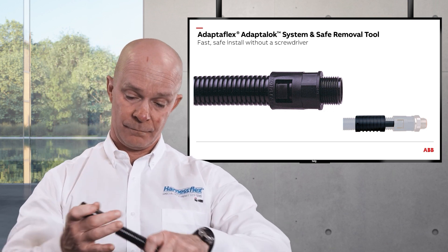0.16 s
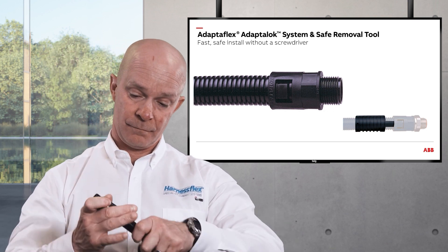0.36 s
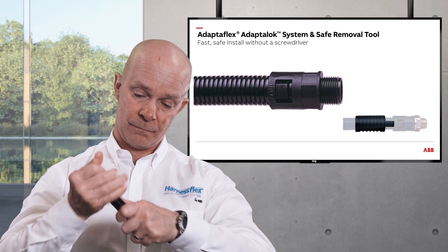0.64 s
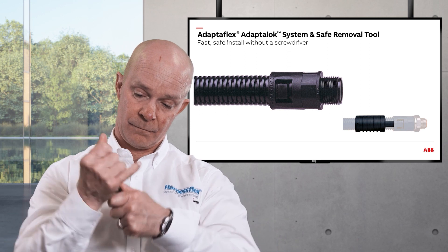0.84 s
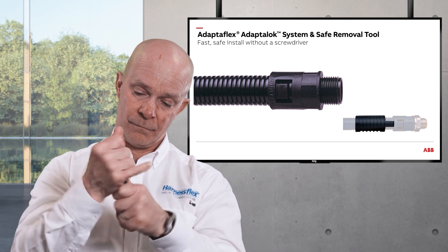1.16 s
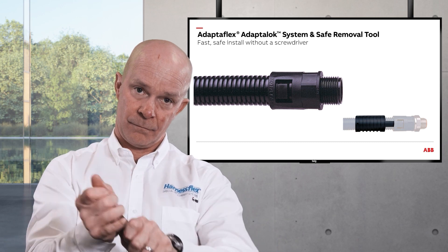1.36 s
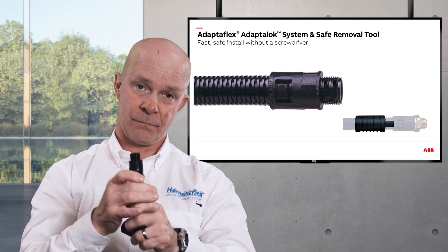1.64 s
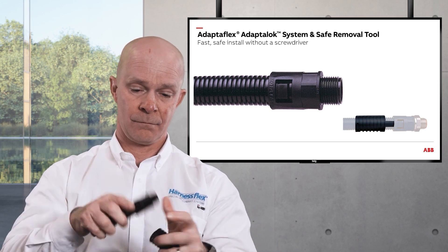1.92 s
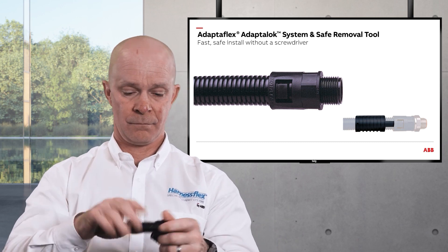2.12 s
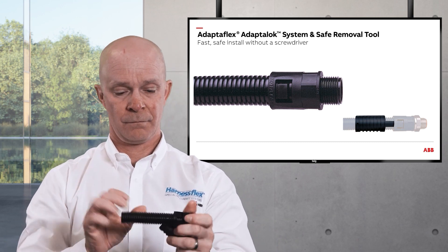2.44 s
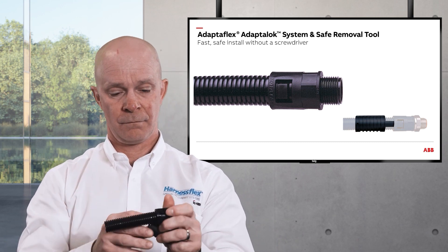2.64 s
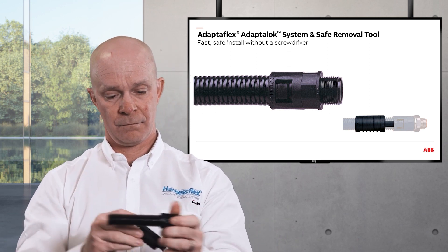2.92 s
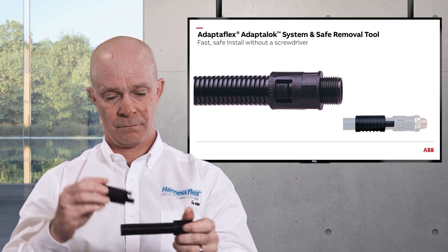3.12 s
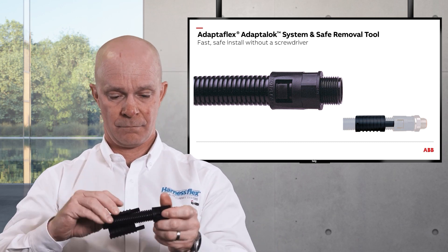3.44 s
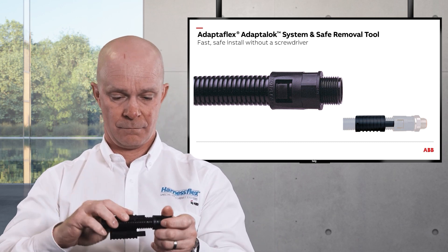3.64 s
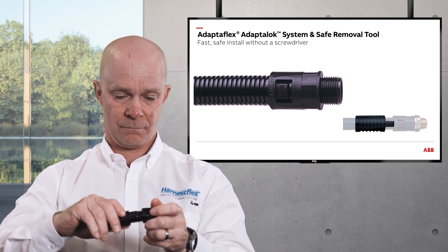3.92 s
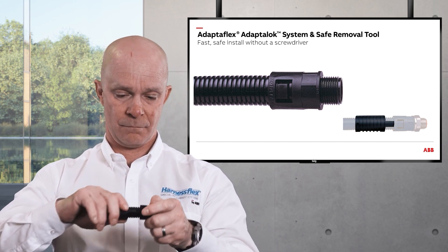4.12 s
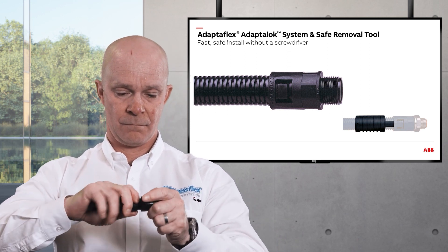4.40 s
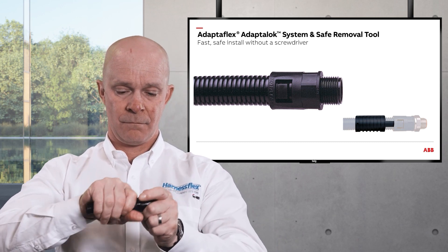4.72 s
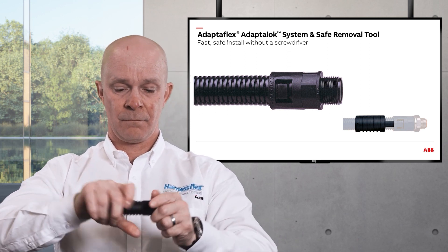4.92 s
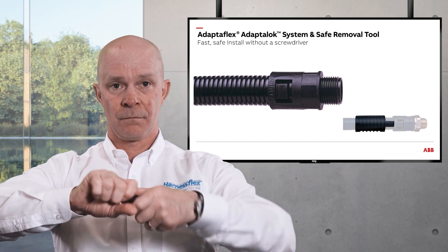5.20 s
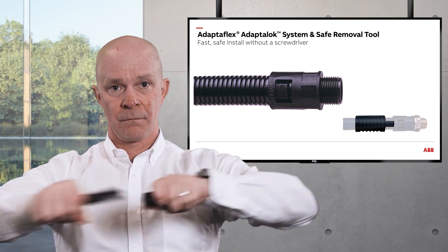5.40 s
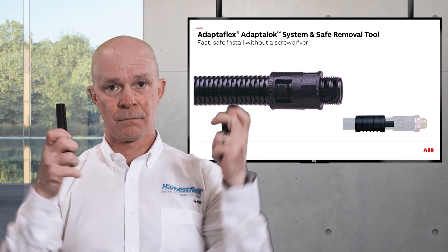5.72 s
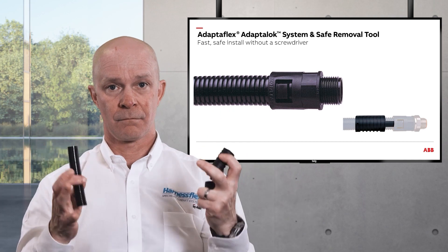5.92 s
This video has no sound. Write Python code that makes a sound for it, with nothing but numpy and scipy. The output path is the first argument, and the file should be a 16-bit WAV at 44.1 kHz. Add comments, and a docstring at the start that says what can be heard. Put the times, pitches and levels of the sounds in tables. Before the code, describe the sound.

Hard plastic parts knock and snap together in two hands, with brief hollow tube rings, small ticks and faint rubbing in a quiet room.

```python
"""Knocks, clicks and sharp snaps of plastic, some with a short ring, among soft rubs and scrapes in a quiet room.
Hands work a push-fit fitting on corrugated conduit: parts knock together, a removal tool clips on,
and the latch snaps over the ribs until the conduit comes free. Each contact is a noise burst of a few
milliseconds shaped by resonances; hard ones also ring the ribbed wall and the air in the tube.
Grains of noise make the friction, and shaped noise the room tone and low swells of moving arms."""
import sys
import numpy as np
from scipy import signal
from scipy.fft import rfft, irfft
from scipy.io import wavfile
from scipy.ndimage import uniform_filter1d, minimum_filter1d

SR = 44100
rng = np.random.default_rng(int(sys.argv[2]) if len(sys.argv) > 2 else 0)


def write(x):
    x = np.atleast_2d(x).T
    wavfile.write(sys.argv[1], SR, np.round(np.clip(x, -1, 1) * 32767).astype(np.int16))


N = 267113  # scene length in samples

# A finger or sleeve slides, swells, catches on a rib with a small tick and lets go:
# (catch time [s], 60 dB swell [s], 60 dB release [s], dull rub before trim [dB], bright rub before trim [dB],
#  tick level [dB], tick pitch [Hz])
RUB_STROKES = [(0.192, 0.02, .1, -89, -63.5, -37.5, 5600), (.5636, .025, .17, -53, -74, -23, 1040),
               (1.061, 0.18, 0.12, -67, -80, -62, 2968), (1.542, 0.066, .3, -90, -62, -46, 6500),
               (1.665, 0.39, .1, -64, -70, -26, 1656), (1.706, 0.073, .1, -71, -70, -34.5, 4570),
               (2.088, 0.057, .07, -83, -91, -41, 8030), (2.3976, 0.081, .04, -70, -67.5, -36.5, 1950),
               (2.4286, 0.023, .1, -57.5, -65.5, -31.5, 5390), (2.9459, .06, .11, -62, -70, -36, 1720),
               (3.564, 0.073, .13, -55.5, -60.5, -32, 1960), (3.9645, 0.065, .12, -71, -58, -31, 1694),
               (4.5023, .02, .28, -73.5, -64, -29, 3520), (4.581, 0.25, .1, -68, -63.5, -38, 3940),
               (4.6598, 0.066, .07, -55, -77.5, -41, 2143), (4.968, 0.092, .33, -63.5, -66, -37.5, 4010),
               (5.166, 0.074, .28, -64, -56.5, -49, 8530), (5.3497, .25, .04, -71.5, -75, -20, 8830),
               (5.6092, 0.041, .14, -59, -57, -26, 2930), (5.6987, .05, .07, -57, -66, -29, 2086),
               (5.902, .1, .25, -72, -80.5, -60, 2190)]
EDGE_HZ = 16200  # upper band limit
TAPS, LEAD = 4096, 128  # samples: one contact's frame, and the lead-in before its blow


def amp(db):
    """Decibels to gain."""
    return 10 ** (np.asarray(db) / 20)


def evened(x):
    """Scales to rms 1."""
    return x / np.sqrt(np.mean(x ** 2) + 1e-20)


def read(points, hz):
    """Reads a curve of (frequency, value) points on a log-frequency axis."""
    f, value = np.transpose(points)
    return np.interp(np.log(hz + 1), np.log(f + 1), value)


def add(mix, s, sound):
    """Mixes a sound in at time s."""
    part = mix[max(round(s * SR), 0):][:len(sound)]
    part += sound[:len(part)]


def coloured(x, points):
    """Gives x a spectral colour, at rms 1."""
    hz = np.fft.rfftfreq(len(x), 1 / SR)
    return evened(irfft(rfft(x) * amp(read(points, hz)), len(x)))


def causal(db):
    """The frequency response of a passive body with this gain: it rings only after the blow."""
    log_gain = np.log(amp(np.r_[db, db[-2:0:-1]]))
    return np.exp(np.conj(signal.hilbert(log_gain)))[:len(db)]


def fade(t, t60, bend=1):
    """Falls 60 dB in t60; with bend over 1 it holds at first and then dies faster."""
    return np.exp(-np.log(1000) * (t / t60) ** bend)


def grains(per_s, spread_db):
    """Tiny slips at random moments, of uneven size when spread_db is above 0."""
    size = amp(spread_db * np.minimum(rng.exponential(1, N), 4)) * rng.choice([-1, 1], N)
    return size * (rng.random(N) < per_s / SR)


def contacts():
    """All knocks, and the light tick with which each sliding stroke catches."""
    # plastic on plastic: (time [s], level [dB], contact length [ms], thud [dB], knock [dB], fizz [dB],
    # first mode of the struck part [Hz], second mode [Hz], room send [dB])
    knocks = [(.3014, -0.5, 1.6, 5, -8, -11, 1110, 1330, -8.5),
              (.383, -18, 3.1, -10, -5, -24, 1150, 1950, 3),
              (.3962, -9, 2.5, 4.5, -8.5, -29, 2300, 1480, -14.5),
              (.4053, 0, 1.84, -4.5, -12.5, -27, 1060, 6030, -8.5),
              (.41, -9, 2, -18, -13, -10.5, 1960, 2800, -27),
              (.833, -27.5, 1.5, 7, 6.5, -12.5, 3530, 1110, 4),
              (.8455, 2, 2.18, 1.5, 13.5, 9.5, 4830, 3430, -7.5),
              (1.1011, 13, 2.5, -6.5, 7, -3, 3670, 1720, -10.5),
              (1.2207, 19.5, 1.62, -7, 2, -15.5, 3867, 1398, -15.5),
              (2.3246, 1, 1.26, -22, -5.5, -15.5, 1584, 2550, -14),
              (2.6046, -6.5, 1.82, 3.5, 11, -6.5, 1745, 813, -13),
              (3.3589, 1, 1.91, -17, -10, -4, 2390, 4626, -7),
              (3.3923, 0.5, 3.1, -16, -8, -15.5, 1930, 2950, -11.5),
              (3.4261, 10, 3.9, -17.5, -9.5, -17, 3210, 1900, -25),
              (3.4347, 6, 1, -37, -26, -18, 1920, 3370, -10),
              (3.4404, -1.5, 2, -11, -4, -13, 970, 1964, -10),
              (3.446, -2, 2.5, -23, 6.5, -11, 3510, 2600, -15),
              (3.7483, -9, 4.3, -12.5, -3.5, -24.5, 4200, 2210, -2),
              (3.772, -3, 2.5, -11, -1.5, -12, 4790, 1760, -12.5),
              (3.7915, -12, 3.3, -5, 2, -18.5, 9100, 7200, -14.5),
              (3.8658, -7.5, 2.26, -14.5, -2.5, -6, 2127, 10000, -12.5),
              (4.206, -25, 4.4, 9, -0.5, -8.5, 3090, 642, -1.5),
              (4.22, -15, 3, -2.5, -1.5, -4, 1640, 740, -17.5),
              (4.229, -0.5, 2.2, -3, -6, -6.5, 1690, 5440, -11),
              (4.2596, 0, 7.1, 12.5, 3, -4, 1630, 4230, -13),
              (4.2743, 17.5, 3.2, -9, -11.5, -10.5, 1560, 2640, -18),
              (4.739, 0.5, 3.5, 13.5, 15.5, -3.5, 2760, 1730, -11.5),
              (4.7445, 13.5, 1.73, 1.5, 1.5, -11.5, 1612, 1182, -13),
              (5.3757, 6, 2.64, -13, -1.5, -19, 720, 7700, -0.5),
              (5.3976, 12, 1.1, -34.5, -16.5, -11.5, 3200, 2460, -9),
              (5.4221, 19.5, 1.37, -10, 0, -5.5, 692, 2150, -31),
              (5.449, -5, 1.8, 9.5, 15.5, 6.5, 1570, 2220, -41.5),
              (5.4577, -7.5, 1.5, 22.5, 14.5, -19.5, 1620, 680, -11.5),
              (5.7166, -5, 2.5, -34, -32, -14, 11600, 5260, -10.5),
              (5.7566, -22, 2.3, -20, 4.5, -1.5, 6830, 3950, -10.5)]
    # tone shared by all ticks: [thud [dB], knock [dB], fizz [dB]]
    tick_tone = [-6, -4, -18]
    tick_ms, tick_room_db = 2.8, -7.5
    overtone = 2.02  # ratio of the second mode to the first
    ticks = [(s, db, tick_ms, *tick_tone, hz, hz * overtone, tick_room_db)
             for s, *_, db, hz in RUB_STROKES]
    return list(knocks) + ticks


def chatter(ms, tick=1.4, after=1.0, onset=0.37, flatten=.35):
    """Spectrum of one contact: brief ones are a sharp tick, long ones a swell of chattering faces."""
    t_ms = np.maximum(np.arange(TAPS) - LEAD, 0) / SR * 1000
    pressed = np.exp(-(t_ms / ms) ** 4) + after * np.exp(-t_ms / ms)
    grip = pressed * (1 - np.exp(-t_ms / (onset * ms)))
    burst = rng.standard_normal(TAPS) * grip
    burst[LEAD + 3] += tick * np.sqrt(SR / 1000) / ms
    z = rfft(burst)
    z /= (abs(z) + 1e-12) ** flatten  # so short a blow carries all pitches fairly evenly
    return z / np.sqrt(np.mean(abs(z) ** 2))


def clicks(ring_share=0.093, sub_db=-22, top_db=-3):
    """Each contact rings the shell and two modes of the struck part; returns direct sound and room send."""
    # tone bands of a contact: thud, knock, reference, bite and fizz [Hz]
    band_hz = [430, 1000, 2100, 4200, 9500]
    # the fitting's shell, which colours every contact: (frequency [Hz], width [Hz], gain [dB])
    shell_modes = [(457, 41, 3), (837.2, 86, 0), (1339, 70, -4), (1795, 760, 1), (2520, 720, -2.5),
                   (3200, 650, 1), (4772, 350, 1.5), (8300, 1100, -0.5), (11140, 2800, 1.5)]
    # prominence of the struck part's two modes at level 0 and above: [first [dB], second [dB]]
    mode_db = [12.5, 8]
    purity = 0.17  # the lighter the touch, the more the modes stand out: dB per dB under level 0
    bite_share, bite_db = 0.31, 2  # the bite near 4 kHz follows the fizz: dB per dB, plus an offset in dB

    hz, direct, sent = np.fft.rfftfreq(TAPS, 1 / SR), np.zeros(N), np.zeros(N)
    shell_db = sum(db / (1 + (2 * (hz - f) / width) ** 2) for f, width, db in shell_modes)
    for s, db, ms, thud, knock, fizz, hz1, hz2, room_db in contacts():
        bite = bite_db + bite_share * fizz
        lows = [(40, thud + 2 * sub_db), (150, thud + sub_db)]
        bands = list(zip(band_hz, [thud, knock, 0, bite, fizz]))
        colour_db = read(lows + bands + [(EDGE_HZ, fizz + top_db)], hz)
        ring_levels = np.array(mode_db) - purity * min(db, 0)
        for ring_hz, ring_db in zip((hz1, hz2), ring_levels):
            detuning = 2 * (hz / ring_hz - 1) / ring_share
            colour_db += 10 * np.log10(1 + amp(ring_db) ** 2 / (1 + detuning ** 2))
        body = causal(db + colour_db + shell_db)
        click = irfft(chatter(max(ms, .5)) * body)[:TAPS // 2]
        add(direct, s - LEAD / SR, click)
        add(sent, s - LEAD / SR, amp(room_db) * click)
    return direct, sent


def air_column(rise_s=0.002, damping_s=.16):
    """The air in the tube rings at a pitch set by how far it is pushed into the fitting; one row instead rings
    the fitting's hollow on its own."""
    # rung by a snap: (time [s], pitch [Hz], level [dB], t60 before the hand's damping [s]); # the row at 4.2287
    # s is the hollow of the fitting ringing by itself
    air_rings = [(1.1015, 856, -26, .2), (1.2213, 860, -27, 0.17), (2.6054, 908, -54, .15),
                 (3.3935, 481, -39.5, 0.062), (4.2195, 541, -23, 0.047), (4.2287, 1702, -35, 0.069),
                 (4.2605, 624, -15.5, 0.044), (4.2748, 539, -15.5, 0.044), (4.7345, 601, -14.5, 0.038),
                 (4.745, 562, -11.5, 0.064), (4.7449, 337, -30, 0.039), (5.3764, 675, -19.5, 0.067),
                 (5.3972, 710, -16, 0.066), (5.4225, 668, -12.5, 0.054), (5.439, 426, -25.5, .073),
                 (5.455, 101, -42, 0.12)]
    socket_hz, socket_db = 1682, -11  # the hollow of the fitting rings along at one pitch
    t, out = np.arange(SR // 2) / SR, np.zeros(N)
    held = np.exp(-(t / damping_s) ** 3)  # the gripping hand soon stops the ring
    socket = amp(socket_db) * np.sin(2 * np.pi * socket_hz * t)
    for s, hz, db, t60 in air_rings:
        tone = np.sin(2 * np.pi * hz * t) + socket
        ring = amp(db) * tone * fade(t, t60) * held * (1 - np.exp(-t / rise_s))
        # the ring carries little below half its pitch
        opening = signal.butter(2, hz / 2, "high", fs=SR, output="sos")
        add(out, s, signal.sosfilt(opening, ring))
    return out


def ribbed_wall(count=200, rise_s=.0025, edge_loss=0.072, bend=1.134):
    """Many nearly equal ribs give a cluster of modes that outlasts the click; the outer ones die sooner."""
    # (time [s], centre [Hz], spread [octaves], level [dB], t60 at the centre [s])
    rib_rings = [(.4056, 2210, 0.28, -45, 0.12), (0.8456, 5400, 0.14, -37, 0.38),
                 (.848, 3165, 0.22, -48.5, 0.57), (1.103, 3940, 0.47, -26.5, 0.3),
                 (1.224, 4096, 0.14, -27.5, 0.37), (1.2225, 4390, 0.37, -36.5, 0.49),
                 (1.223, 1750, .12, -49.5, .25), (1.7011, 4540, 0.043, -48.5, 0.05),
                 (2.606, 4580, 0.19, -60, 0.25), (2.605, 1808, 0.012, -49.5, 0.24),
                 (3.8655, 2048, .078, -63, .2), (4.275, 2850, .15, -34.5, .21),
                 (4.745, 2550, 0.25, -30, .26), (5.399, 2385, 0.058, -28, 0.12)]
    t, out = np.arange(SR // 3, dtype=np.float32) / SR, np.zeros(N)
    for s, centre_hz, octaves, db, t60 in rib_rings:
        # offset from the centre in spreads, phase in cycles
        offset, phase = np.float32([rng.standard_normal((count, 1)), rng.random((count, 1))])
        modes = np.sin(2 * np.pi * (centre_hz * 2 ** (octaves * offset) * t + phase))
        extra_loss = np.exp(-offset ** 2 * float(np.log(1000) * edge_loss / t60) * t)
        cluster = (modes * extra_loss).sum(0) / np.sqrt(count / 2)
        add(out, s, amp(db) * cluster * fade(t, t60, bend) * (1 - np.exp(-t / rise_s)))
    return out


def scrapes():
    """Dense slips while the fitting and its latch drag along the conduit."""
    # plastic dragging over the ribs: (start [s], length [s], level [dB])
    drags = [(0.395, 0.036, -63), (0.815, 0.11, -60), (3.368, 0.026, -40.5), (4.19, 0.026, -64),
             (4.2597, 0.013, -27), (4.729, 0.02, -41), (5.372, .015, -49), (5.395, 0.037, -28.5),
             (5.418, 0.029, -26), (5.454, 0.0043, -38)]
    # spectrum of the drag: (frequency [Hz], relative level [dB])
    drag_colour = [(100, -23.5), (220, -19.5), (380, -8), (600, 7.5), (1050, -5.5), (1600, 0.5),
                   (3000, -8.5), (5000, 0), (9000, -7), (16000, -22.5)]
    force = np.zeros(N)
    for s, length, db in drags:
        add(force, s, amp(db) * signal.windows.tukey(max(int(length * SR), 8), .25))
    return force * coloured(grains(per_s=5900, spread_db=4), drag_colour)


def rubs(dull_db=-3.5, bright_db=-1, stick_db=1.5, bend=1.34):
    """Skin and cloth slide with a faint grain, catching and slipping on the ribs."""
    # spectrum of the dull rub: (frequency [Hz], relative level [dB])
    dull_colour = [(500, -24.5), (1300, -21.5), (1750, -5), (2200, 2.5), (2750, 4.5), (3300, -8.5),
                   (6000, -36.5)]
    # spectrum of the bright rub: (frequency [Hz], relative level [dB])
    bright_colour = [(2000, -33), (3200, -6.5), (4400, 1.5), (6000, -6), (8000, -5.5), (12000, -13.5),
                     (13500, -21.5), (16000, -14.5)]
    t, force = np.arange(N) / SR, np.zeros((2, N))
    for s, swell_s, release_s, dull, bright, *_ in RUB_STROKES:
        stroke = fade(abs(t - s), np.where(t < s, swell_s, release_s), bend)
        force += amp([[dull], [bright]]) * stroke
    catching = evened(uniform_filter1d(rng.standard_normal(N), size=400))
    dull_force, bright_force = uniform_filter1d(force, size=500, axis=1) * amp(stick_db * catching)
    dull_grain = coloured(grains(per_s=3000, spread_db=0.0), dull_colour)
    bright_grain = coloured(grains(per_s=2100, spread_db=1.5), bright_colour)
    return amp(dull_db) * dull_force * dull_grain + amp(bright_db) * bright_force * bright_grain


def room(x, first_s=0.00046, build_s=0.0028, bend=1.13):
    """A small damped room: dense random reflections whose decay time and level vary with pitch."""
    # decay: (frequency [Hz], t60 [s])
    decay_times = [(200, .16), (700, .2), (1800, .2), (4500, .21), (9000, .205), (15000, .155)]
    # spectrum of the reflections: (frequency [Hz], relative level [dB])
    echo_colour = [(150, 5), (500, 1), (1200, -2), (2500, 2.5), (5000, -4), (10000, -3.5), (16000, -3)]
    t = np.arange(SR // 2) / SR
    taps = rng.standard_normal(len(t)) * (rng.random(len(t)) < 6000 / SR)  # about 6000 reflections/s
    hz, at, z = signal.stft(taps, SR, nperseg=256)
    z = z * fade(at, read(decay_times, hz)[:, None], bend) * amp(read(echo_colour, hz))[:, None]
    build = 1 - np.exp(-np.maximum(t - first_s, 0) / build_s)
    tail = signal.istft(z, SR, nperseg=256)[1][:len(t)] * build
    return signal.fftconvolve(x, tail / np.linalg.norm(tail))[:N]


def background(floor_db=-64.5):
    """Steady room tone, and the low swells of moving arms, both from shaped noise."""
    # low swells as the arms move: (peak time [s], time from the peak to 1/e [s], level [dB])
    arm_swells = [(0.3, 0.033, -49.5), (3.158, 0.034, -46.5), (4.942, 0.09, -58), (5.918, 0.066, -50.5)]
    # spectrum of the swells: (frequency [Hz], relative level [dB])
    swell_colour = [(10, -12.5), (24, 3), (33, -6.5), (45, -6.5), (70, -40), (200, -29), (600, -89)]
    # spectrum of the room tone: (frequency [Hz], relative level [dB])
    floor_colour = [(15, 0), (33, 4.5), (55, -6), (130, -8), (240, -8), (450, -19.5), (900, -24.5),
                    (2600, -32.5), (6300, -36.5), (9000, -41), (12500, -46), (13500, -56.5), (16000, -60)]
    t = np.arange(N) / SR
    motion = sum(amp(db) * np.exp(-((t - s) / length) ** 2) for s, length, db in arm_swells)
    tone = amp(floor_db) * coloured(rng.standard_normal(N), floor_colour)
    return tone + motion * coloured(rng.standard_normal(N), swell_colour)


def scene(ring_room_db=-9, scrape_room_db=-6):
    """Clicks, ringing tube and friction, close by, with the room behind them."""
    direct, sent = clicks()
    ringing = air_column() + ribbed_wall()
    scraping = scrapes()
    echo = room(sent + amp(ring_room_db) * ringing + amp(scrape_room_db) * scraping)
    return (direct + ringing + scraping + echo + rubs() + background())[None]


def record(dry):
    """A fast limiter holds the hardest snaps under full scale; then the band limit."""
    allowed = np.minimum(.95 / (abs(dry) + 1e-9), 1)
    gain = uniform_filter1d(minimum_filter1d(allowed, size=33), size=33)
    band_limit = signal.firwin(255, EDGE_HZ, window=("kaiser", 8), fs=SR)
    return signal.oaconvolve(dry * gain, band_limit[None], "same")


dry = scene()
out = record(dry)
write(out)
```